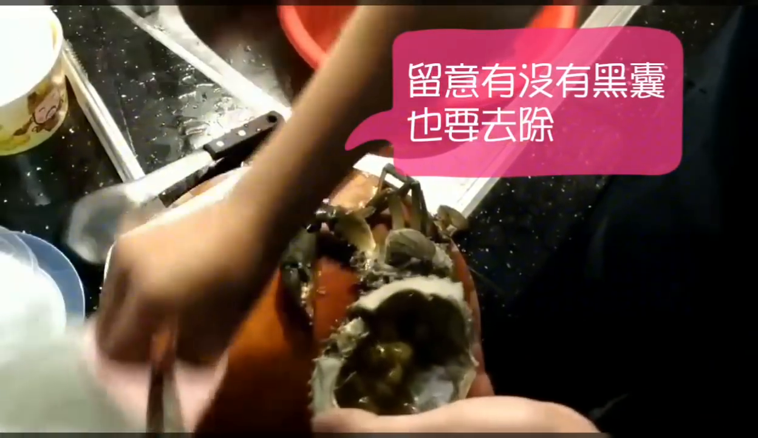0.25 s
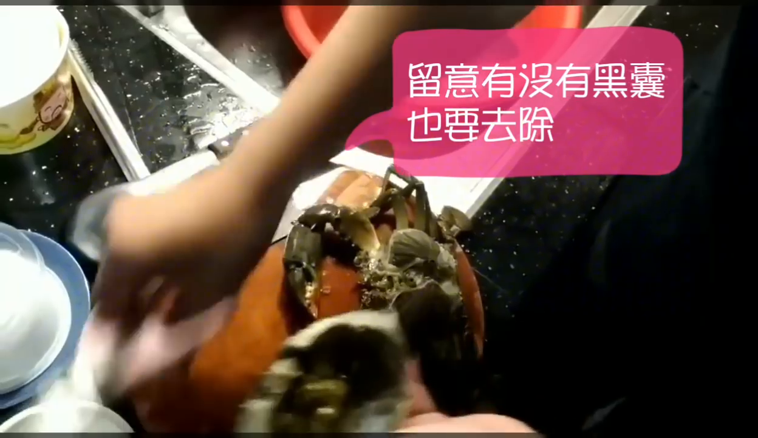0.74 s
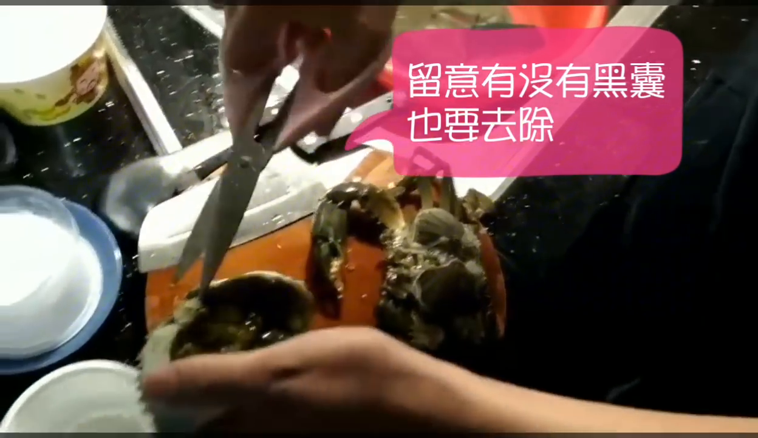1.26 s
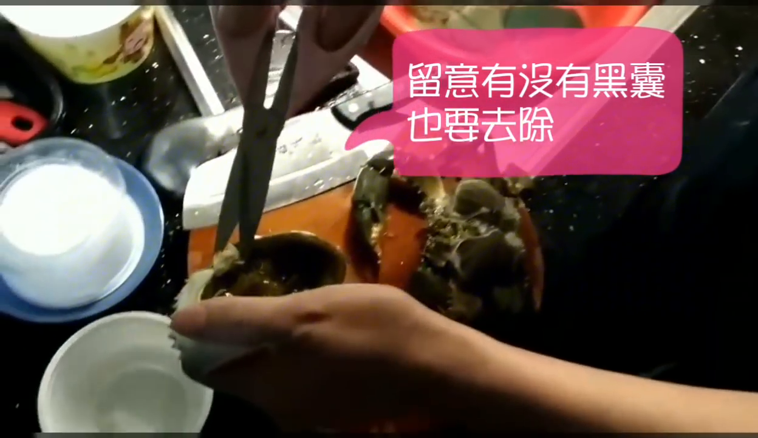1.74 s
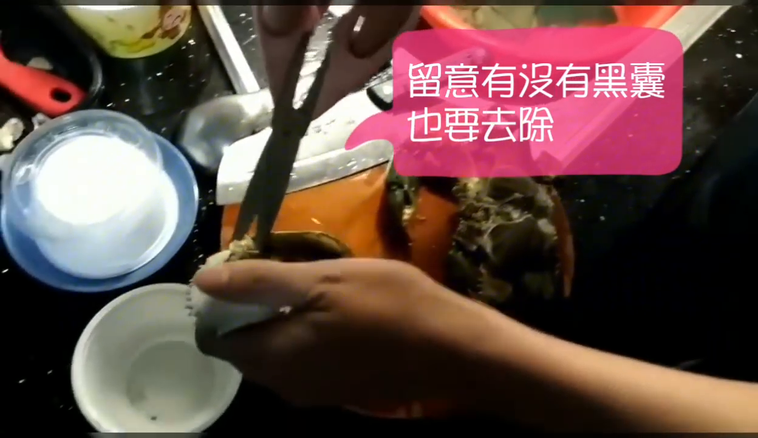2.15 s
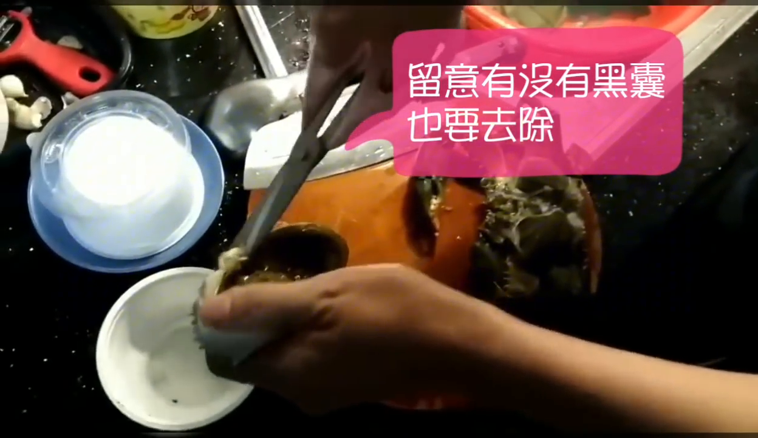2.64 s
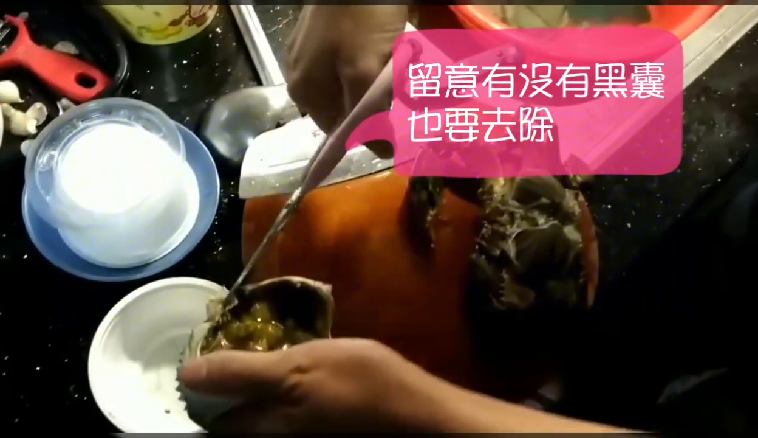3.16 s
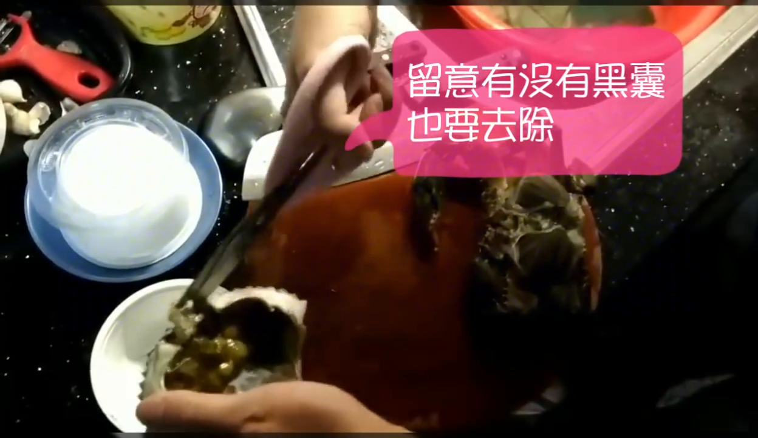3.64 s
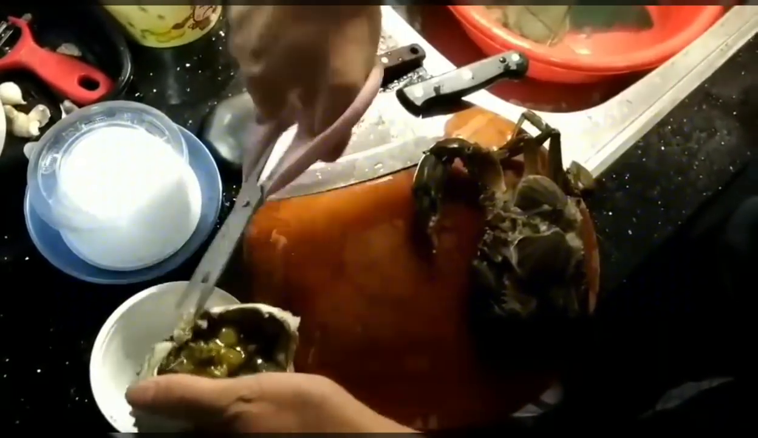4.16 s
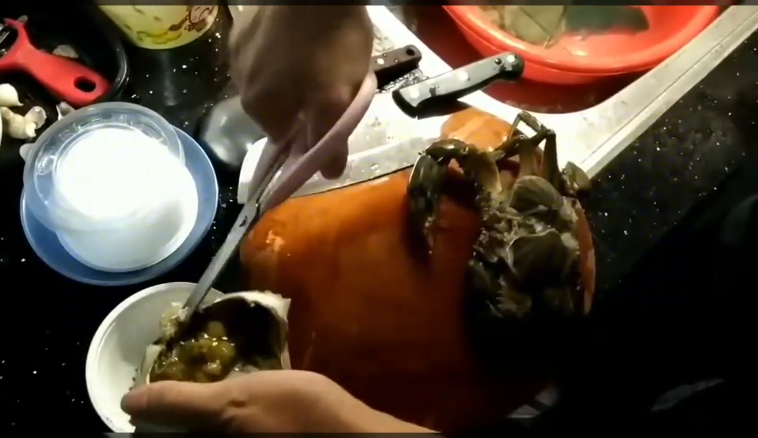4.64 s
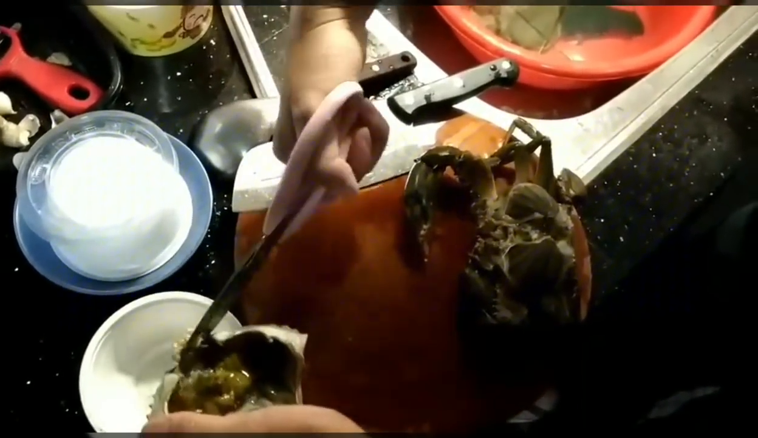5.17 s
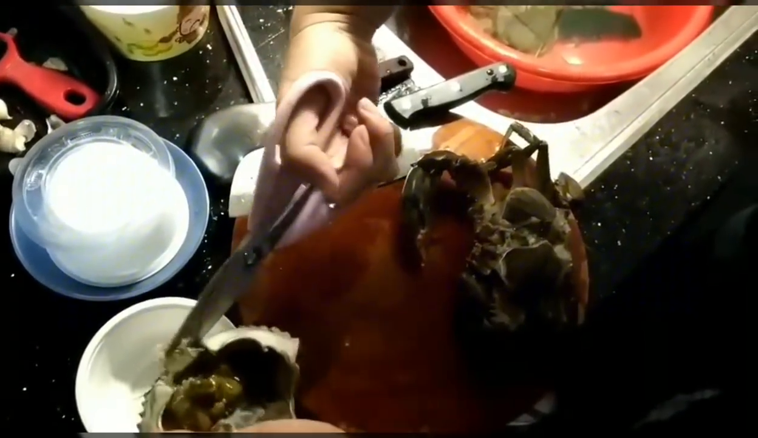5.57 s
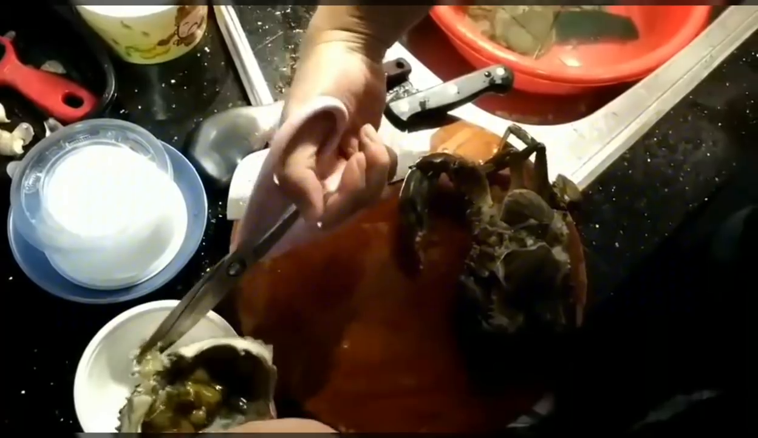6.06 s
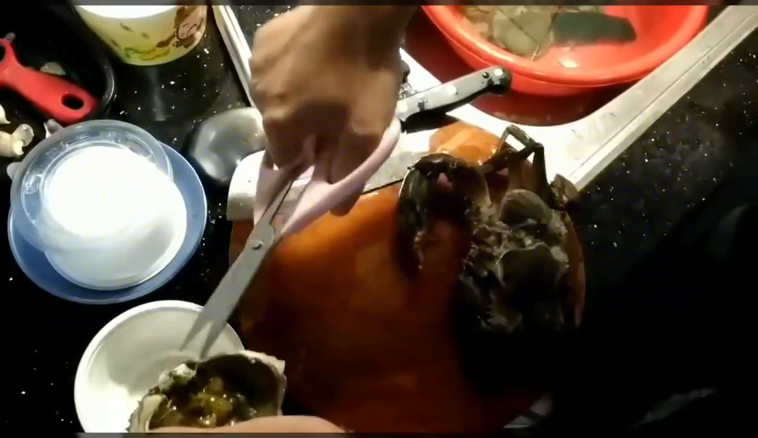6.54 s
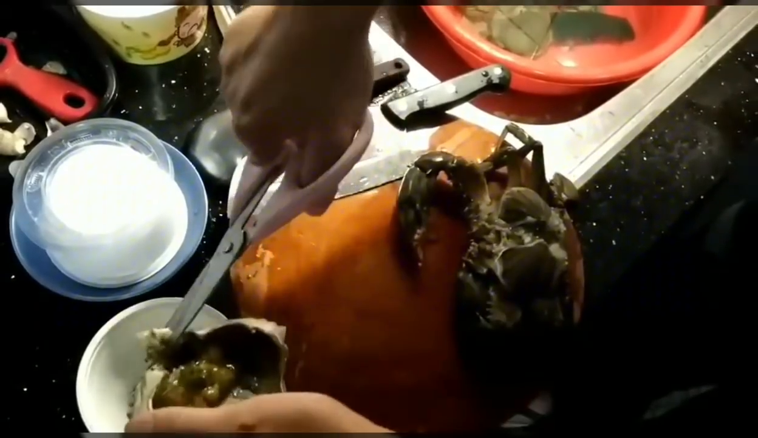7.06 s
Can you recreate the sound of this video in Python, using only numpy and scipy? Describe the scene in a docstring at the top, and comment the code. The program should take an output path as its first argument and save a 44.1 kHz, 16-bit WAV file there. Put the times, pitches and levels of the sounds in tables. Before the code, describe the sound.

Close stereo pickup in a small, hard kitchen with a quiet low appliance hum and faint airy hiss. A china bowl lands on a stone counter, knocking and clinking, then rattles as it is nudged. Scissors tick and scrape lightly at a crab shell, give a few sharp cracks, then a dense run of brittle snaps and gritty rubbing, fading to small ticks and a last scrape.

```python
"""China bowl and crab shell

A china bowl knocks low and clinks high as it is set down on a stone counter and nudged into place.
Then kitchen scissors pick, scrape and crack their way round the rim of a hand-held crab shell, and
at times click shut in the air: each snap is a burst of impulses through ringing modes, with a thud,
treble spray and splinters. Rubbing is a train of tiny slips. A small hard kitchen of decaying noise
answers, over the steady tones of an appliance, a low drone, a soft rush of air and a faint hiss."""
import sys
import numpy as np
from scipy import signal
from scipy.fft import rfft, irfft, next_fast_len
from scipy.io import wavfile
from scipy.ndimage import uniform_filter1d, map_coordinates

SR = 44100
rng = np.random.default_rng(int(sys.argv[2]) if len(sys.argv) > 2 else 0)


def unload_audio(sound):
    """Save the sound as a 16-bit wav file, at the path given as the first command line argument."""
    columns = np.transpose(np.atleast_2d(sound))
    # keep every value between -1 and 1, then stretch to whole-number steps
    steps = np.round(np.clip(columns, -1, 1) * 32767)
    wavfile.write(sys.argv[1], SR, steps.astype(np.int16))


N = 322318
SIZE = 32768  # samples in one response
HZ = np.fft.rfftfreq(SIZE, 1 / SR)
AGE = np.arange(SIZE) / SR
TIME = np.arange(N) / SR
TOP_HZ = 13200  # upper band limit
MIC_SPACING_M = .15
LEAD_S = .003  # room for the softened onset


def amp(db):
    """Decibels to gain."""
    return 10 ** (np.asarray(db) / 20)


def unit(x):
    """Scale to rms 1."""
    return x / np.sqrt(np.mean(x ** 2) + 1e-20)


def along(points, hz):
    """Read (Hz, value) points on a log axis."""
    f, v = np.transpose(points)
    return np.interp(np.log(hz + 1), np.log(f + 1), v)


def shape(points):
    """Gain of a spectrum, with unit power."""
    return unit(amp(along(points, HZ)))


def curve(rows):
    """One value per sample from (s, value) rows."""
    return np.interp(TIME, *np.transpose(rows))


def wobble(rate):
    """A smooth random curve, rate knots a second."""
    knots = rng.standard_normal(int(N * rate / SR) + 4)
    return map_coordinates(knots, [TIME * rate])


def lift(modes):
    """Resonance peaks standing on a flat response."""
    power = 1
    for hz, width, db in modes:
        power = power + amp(db) ** 2 / (1 + (2 * (HZ - hz) / width) ** 2)
    return np.sqrt(power)


def causal(gain):
    """The minimum-phase impulse response of a gain curve."""
    cepstrum = irfft(np.log(np.maximum(gain, gain.max() * 1e-6)))
    cepstrum[1:SIZE // 2] *= 2
    cepstrum[SIZE // 2 + 1:] = 0
    return irfft(np.exp(rfft(cepstrum)))


def convolve(x, response):
    """Convolve along time, keeping the length of x."""
    return signal.fftconvolve(np.atleast_2d(x), np.atleast_2d(response), axes=1)[:, :x.shape[-1]]


def add(track, s, sound):
    """Mix a sound into the track at time s."""
    start = max(round(s * SR), 0)
    track[:, start:start + sound.shape[1]] += sound[:, :track.shape[1] - start]


def diffuse(size):
    """White noise from all sides: alike at both microphones in the bass, unrelated in the treble."""
    alike = .86 * np.sinc(2 * np.fft.rfftfreq(size, 1 / SR) * MIC_SPACING_M / 343)  # 343 m/s: sound
    white = rfft(rng.standard_normal((2, size)))
    mid, side = irfft(white * np.sqrt([1 + alike, 1 - alike]), size)
    return unit(np.array([mid + side, mid - side]))


def noise(spectrum):
    """Coloured stereo noise of rms 1."""
    white = diffuse(next_fast_len(N + SIZE))
    return unit(convolve(white, causal(shape(spectrum)))[:, -N:])


def patchy(x, depth_db):
    """Let each region of a noise's spectrum swell and sink on its own."""
    z = signal.stft(x, nperseg=1024)[2]
    field = rng.standard_normal(z.shape[1:])
    field = uniform_filter1d(field, size=6, axis=0)  # across frequency
    field = uniform_filter1d(field, size=12, axis=1)  # across time
    return unit(signal.istft(z * amp(depth_db * unit(field)), nperseg=1024)[1][:, :N])


# steady tones of the appliance: (frequency [Hz], relative level [dB])
HUM_TONES = [(81, -2.5), (237, -7), (2372, -20.5)]
# the soft rush as it swells and fades: (time [s], relative level [dB])
AIR_LEVEL = [(0, -51.5), (.35, -61), (1.7, -61.5), (3.45, -56), (4.8, -61), (6.1, -69.5), (7.31, -65)]
# colours of the low drone, the rush and the hiss: (frequency [Hz], relative level [dB])
DRONE_SPECTRUM = [(20, -33), (40, -4.5), (62, -5.5), (85, 12), (105, -3.5), (160, 2), (245, -1.5),
                  (320, -5), (420, -14), (700, -42.5), (1500, -58)]
RUSH_SPECTRUM = [(120, -20), (300, 7), (440, -3.5), (550, -2.5), (800, -3), (1050, -3.5), (1400, -15.5),
                 (2200, -17), (5000, -29.5), (12000, -64)]
HISS_SPECTRUM = [(500, -14.5), (1200, 1.5), (1900, -4), (2400, 1), (3000, 1), (3800, -5.5), (5000, -8),
                 (7500, -10.5), (12300, -15), (14000, -31)]


def background():
    """Sines with slightly wandering phase hum over three coloured noises: drone, rush and hiss."""
    tones = 0
    for hz, db in HUM_TONES:
        phase = 2 * np.pi * hz * TIME + 0.32 * wobble(19.0)
        tones = tones + amp(db) * np.sin(phase)
    hum = np.sqrt(2) * amp(-62.5) * tones
    drone = amp(-61.5 + 1.3 * wobble(11.0) + 0.9 * wobble(2.3)) * noise(DRONE_SPECTRUM)
    air_db = curve(AIR_LEVEL) + 2.0 + 0.31 * wobble(6.7)
    air = amp(air_db) * patchy(noise(RUSH_SPECTRUM), depth_db=2.5)
    hiss = amp(-72.0) * patchy(noise(HISS_SPECTRUM), depth_db=4.0)
    lean_right = amp([[-.3], [.3]])
    return hum + (drone + air) * lean_right + hiss


# steel or fingers rub: (time the stroke is full [s], length [s], relative level [dB])
RUB_STROKES = [(0.017, 0.07, -55.5), (1.637, 0.017, -57), (1.756, 0.36, -65.5), (2.255, 0.025, -56),
               (2.395, 0.53, -64.5), (3.098, 0.17, -65), (4.379, 0.08, -52.5), (4.547, 0.88, -58.5),
               (5.24, 0.5, -57), (5.85, 0.095, -55.5), (6.913, 0.079, -63), (7.298, .03, -48.5)]
STROKE_RISE_S, STROKE_FADE_S = 0.013, 0.075  # time constants
HANDLING_DB = -73  # light rubbing between strokes, on the scale of the stroke levels


def rub_strength():
    """How strongly steel or fingers rub: each stroke sets in, holds and lets go."""
    strokes = []
    for s, length, db in RUB_STROKES:
        rise = np.minimum(TIME - s, 0) / STROKE_RISE_S
        fade = np.maximum(TIME - s - length, 0) / STROKE_FADE_S
        strokes.append(amp(db) * np.exp(rise - fade))
    return np.maximum(np.max(strokes, axis=0), amp(HANDLING_DB))


def grains(times, centre_hz, octaves, cycles, spread_db, size):
    """Tiny pings, each ringing for a few cycles at its own pitch and strength."""
    pitch, strength = np.clip(rng.standard_normal((len(times), 2)), -2, 2).T[:, :, None]
    hz = np.minimum(centre_hz * 2 ** (octaves * pitch), TOP_HZ)
    age = AGE[:1024]
    ringing = np.sin(2 * np.pi * hz * age) * np.exp(-age * hz / cycles)
    pings = amp(spread_db * strength) * np.sqrt(hz) * ringing
    places = (times * SR).astype(int)[:, None] + np.arange(len(age))
    return np.bincount(places.ravel(), pings.ravel(), size)[:size]


def paths(near_db, near_t60, dull_hz=7000):
    """Short ways to the two microphones: direct, and scattered off nearby things."""
    near = amp(near_db) * unit(diffuse(SIZE) * amp(-60 * AGE / near_t60)) / np.sqrt(SIZE)
    response = convolve(near, causal(1 / np.hypot(1, HZ / dull_hz)))  # reflections lose treble
    response[[0, 1], [0, 7]] += 1  # direct sound: the left microphone is 7 samples nearer
    return response


# how long the kitchen rings: (frequency [Hz], time to fall 60 dB [s])
KITCHEN_T60 = [(150, 0.81), (800, 0.61), (2500, 0.38), (6000, 0.49), (12000, 0.33)]


def kitchen(build_s=0.0011):
    """A fresh tail of the room: it builds up, then each frequency dies at its own speed."""
    hz, t, z = signal.stft(diffuse(SIZE), SR, nperseg=256)
    decay = amp(-60 * t / along(KITCHEN_T60, hz)[:, None])
    tail = signal.istft(z * decay, SR, nperseg=256)[1][:, :SIZE]
    return unit(tail * (1 - np.exp(-AGE / build_s))) / np.sqrt(SIZE)


# ring of the shell between the blades: (frequency [Hz], width [Hz], lift [dB])
SHELL_RING = [(1337, 50, -2.5), (1570, 280, 1), (1980, 140, 14.5), (2260, 75, 9), (2340, 68, 5.5),
              (2410, 110, 5), (3000, 56, -2.5), (2983, 78, 6), (3330, 67, -2), (4360, 140, 2.5),
              (4800, 92, -1.5), (6870, 140, 0.5), (7500, 70, 6.5), (8260, 67, 4.5)]
# colour of the rubbing: (frequency [Hz], relative level [dB])
RUB_SPECTRUM = [(200, -50), (650, 9.5), (1200, 4), (1900, 2.5), (3000, 6), (4500, 1), (7500, -12.5),
                (12000, -17), (14000, -56.5)]
CRACKLE_DB, CRACKLES_PER_S = -9.5, 160  # crumbs: level relative to the rub strength, mean rate


def scraping(slips_per_s=700, spread_db=2.5):
    """Steel or fingers rub in many tiny slips of uneven size, with a crackle of crumbs."""
    caught = rng.random(N) < slips_per_s / SR
    unevenness = amp(spread_db * np.clip(wobble(81), -2, 2))
    slips = caught * rng.uniform(-1.1, 1, N) * unevenness
    colour = unit(shape(RUB_SPECTRUM) * np.sqrt(lift(SHELL_RING)))
    rubbed = convolve(unit(slips), causal(colour))
    crumb_times = TIME[rng.random(N) < CRACKLES_PER_S / SR]
    crumbs = grains(crumb_times, centre_hz=2700, octaves=0.49, cycles=1.8, spread_db=5.0, size=N)
    strength = rub_strength()
    crumb_paths = unit(paths(near_db=-3, near_t60=.04)) / np.sqrt(SIZE)
    crackle = convolve(unit(crumbs) * strength, crumb_paths)
    rub_paths = unit(paths(near_db=6, near_t60=.05) + kitchen()) / np.sqrt(SIZE)
    return amp(-2.0) * convolve(rubbed * strength, rub_paths) + amp(CRACKLE_DB) * crackle


def stray_modes(width_hz, lift_db, count=18):
    """Upper resonances that change with every blow."""
    pitch = 2600 * 4.5 ** ((np.arange(count) + rng.random(count)) / count)  # 2.6 to 11.7 kHz
    chances = rng.standard_normal(count)
    return lift([(hz, width_hz, lift_db + 3 * chance) for hz, chance in zip(pitch, chances)])


def contact(spread, before=0.11, after=0.39, straggle=0.071, count=7):
    """A slightly softened onset, one sharp blow, weaker ones right behind it, then faint stragglers."""
    onset = -LEAD_S * rng.random(count)
    behind = rng.exponential(max(spread, 1e-4), count)
    late = rng.uniform(.012, .05, count)
    times = LEAD_S + np.concatenate([onset, behind, late])
    places = np.clip(times * SR, 0, SIZE - 1).astype(int)
    strengths = np.repeat([before, after, straggle], count) * rng.standard_normal(3 * count)
    force = np.bincount(places, strengths, SIZE)
    force[round(LEAD_S * SR)] += 1
    return force


CHATTER_S, CHATTER_JITTER = .0085, 0.129  # typical gap between rocking contacts; its scatter (share)


def chatter(loss_db, count=5):
    """The force of a rocking foot: a quick run of ever weaker contacts."""
    gaps = CHATTER_S * np.exp(CHATTER_JITTER * rng.standard_normal(count))
    force = np.zeros((1, SIZE))
    for k, s in enumerate(np.cumsum(gaps) - gaps[0]):
        hit = contact(.003, before=0.1, after=0.26, straggle=0.018)
        add(force, s, amp(-loss_db * k) * hit[None])
    return force


def coloured(force, response, gain):
    """A force through a response; the gain sets the colour and the energy that arrives."""
    arriving = rfft(response) * rfft(force)
    colour = uniform_filter1d(np.mean(abs(arriving) ** 2, axis=0), size=170)
    return irfft(arriving * rfft(causal(gain / np.sqrt(abs(colour)))))


def blow(force, gain, close, room_db, size):
    """A struck body heard close by and round the kitchen, whose directions blur peaks over size bins."""
    blurred = np.sqrt(abs(uniform_filter1d(gain ** 2, size=size)))
    room_gain = np.minimum(blurred, 2 * gain)
    return coloured(force, close, gain) + amp(room_db) * coloured(force, kitchen(), room_gain)


# the bowl meets the counter:
# (time [s], relative clink level [dB], relative knock level [dB], lift of the foot's note [dB])
BOWL_KNOCKS = [(0.03, -41.5, -30, 1), (0.4843, -13.5, -13, -3.5), (0.501, -18.5, -20, -13),
               (.631, -37.5, -35, -4), (0.6535, -31.5, -34, 16), (0.731, -26.5, -28.5, -1),
               (0.7811, -32, -37, 10), (.820, -45, -34, 9), (0.844, -41, -40, 11), (.870, -32.5, -31.5, 3),
               (.890, -44, -36.5, 2), (.901, -50, -45, 3)]
# ring of the bowl on the counter: (frequency [Hz], width [Hz], lift [dB])
BOWL_RING = [(500, 16, 5), (753, 22, 11), (857, 48, 21), (1045, 30, 7), (1092, 20, 7), (1172, 45, 10),
             (1302, 30, 5), (2075, 90, 4), (2556, 40, 4), (2885, 60, 6), (3130, 60, 7), (4930, 50, 4),
             (5355, 20, 7), (6420, 50, 4), (8600, 150, 5)]
# colours of the dull knock and the bright clink: (frequency [Hz], relative level [dB])
KNOCK_SPECTRUM = [(25, -38), (90, -21), (200, -18.5), (330, -8.5), (550, -6), (850, -12.5), (1300, 1),
                  (1700, -5), (4000, -54)]
CLINK_SPECTRUM = [(600, -42), (1600, 1.5), (3000, -0.5), (4000, 3), (5500, 1), (7000, -6.5), (8600, -9),
                  (10000, -12), (12300, -14), (14000, -75.5)]
HARD_BLOW_DB = -12  # tabled clink level of a full landing, to which the next settings refer
CHATTER_LOSS_DB, SETTLES = 6.5, 0.13  # loss per contact; further dB lost per dB of softness
CLINK_TOP_HZ, CLINK_DULLS = 10000, 0.35  # treble reach; softer blows reach less high (power of strength)
KNOCK_TOP_HZ, KNOCK_DULLS = 1414, 0.13  # the same for the knock
FOOT_HZ, FOOT_WIDTH_HZ = 486, 200  # low note of the foot bumping along the counter


def bowl():
    """The china foot lands and is nudged along, knocking low and clinking high as it rocks."""
    track, china = np.zeros((2, N)), lift(BOWL_RING)
    for s, clink_db, knock_db, foot_db in BOWL_KNOCKS:
        softer_db = HARD_BLOW_DB - clink_db
        bright_hz = CLINK_TOP_HZ * amp(-CLINK_DULLS * softer_db)
        top_hz = KNOCK_TOP_HZ * amp(-KNOCK_DULLS * softer_db)
        clink = china * stray_modes(width_hz=60, lift_db=2.5) * shape(CLINK_SPECTRUM)
        clink = clink / np.hypot(1, (HZ / bright_hz) ** 2)
        knock = china * lift([(FOOT_HZ, FOOT_WIDTH_HZ, foot_db)]) * shape(KNOCK_SPECTRUM)
        knock = knock / np.sqrt(1 + (HZ / top_hz) ** 16)  # a soft contact leaves upper modes still
        gain = np.hypot(amp(clink_db + 19.0) * unit(clink), amp(knock_db + 19.5) * unit(knock))
        rocking = chatter(CHATTER_LOSS_DB + SETTLES * softer_db)
        close = paths(near_db=8.5, near_t60=0.034)
        add(track, s - LEAD_S, blow(rocking, gain, close, room_db=-4.0, size=30))
    lean_left = amp([[.4], [-.4]])
    return track * lean_left


SPLINTER_DB, SPLINTER_S = 12, .005  # level over the tabled crack; sets how long splinters keep coming


def splinters(crumble, count=9):
    """A handful of bright splintering pings right behind a snap, with unit energy."""
    times = LEAD_S + rng.exponential(np.sqrt(abs(SPLINTER_S * crumble)), count)
    pings = grains(times, centre_hz=5260, octaves=0.52, cycles=5.9, spread_db=1.5, size=SIZE)
    return unit(convolve(pings, paths(near_db=3.5, near_t60=0.04))) / np.sqrt(SIZE)


# the blades break or tick the shell, or click shut in the air: (time [s], relative plate level [dB],
# plate pitch [Hz], lift of the plate's note [dB], lift of the shell's modes [dB],
# thud relative to plate [dB], crack relative to plate [dB], crumbling time [s])
SNAPS_AND_CLICKS = [(1.2114, -28.5, 3100, 10.5, 0, -28.5, -10.5, .0005),
                    (1.594, -29, 2930, 20.5, 8, -14, -23, 0.00056),
                    (1.663, -39.5, 2480, 9, 5, -15, -34, 0.0043),
                    (1.9268, -38.5, 1670, 8, -11, -31, -34, 0.00096),
                    (2.2443, -39.5, 1620, 15, 7, -9, -14, 0.0042),
                    (2.2455, -40, 3570, 3, 10, -26, -18, 0.0023),
                    (2.2535, -38, 3040, 14, 0, -10, -7, 0.0063),
                    (2.508, -38.5, 1610, 6.5, -2.5, -24, -33, 0.0017),
                    (2.592, -45.5, 2140, 4, 2.5, -30, -34, .002),
                    (2.678, -41, 1520, 7, -4.5, -14, -10, .002), (2.688, -40, 2400, 6, 5, -27, -19, 0.0033),
                    (2.6984, -28, 1485, 15.5, -17, -18, -20, 0.0004),
                    (2.701, -30, 2210, 16, -2, -22, -7, 0.0014),
                    (2.9444, -13, 2500, 14, -3, -16, -6.5, .0016),
                    (2.946, -21.5, 1390, -1.5, -5.5, -36, -20, .003),
                    (3.6216, -15, 1266, 3, -1, -19.5, -11, 0.001),
                    (3.6229, -13, 3100, 0, -1, -28, -14, 0.0015),
                    (3.6358, -16, 2430, 7, -2, -17, -5.5, 0.0035),
                    (3.677, -27.5, 2100, 10, -3, -16, -13, 0.0026),
                    (4.344, -36.5, 2850, -4, -4, -13.5, -17.5, 0.0023),
                    (4.407, -45.5, 2100, 4, 3, -22.5, -5.5, .004),
                    (4.424, -44.5, 3500, 3, -2, -20, -10, .003),
                    (4.468, -45, 2000, 5, 0.5, -20, -10.5, .002),
                    (4.488, -41.5, 2100, 3, -2, -12, -18, .003),
                    (4.655, -38.5, 2920, 8, -5, -13, -8.5, 0.0017),
                    (4.667, -45, 2900, 1, -5.5, -22.5, -2, .005),
                    (4.744, -35, 1900, 14.5, -2, -12.5, -9.5, .003),
                    (4.756, -39.5, 1950, 9, -2, -22, -14, .001),
                    (4.8427, -39.5, 1890, 8, -5, -9.5, -28.5, 0.0013),
                    (4.874, -40, 2090, 8, -0.5, -15.5, -9, 0.0022),
                    (4.898, -25.5, 2000, 8, -0.5, -15, -18, .0014),
                    (4.9129, -17, 3020, 1, -4, -26, -7, .002),
                    (4.9196, -22, 1960, 7.5, -2, -21, -17.5, .0008),
                    (4.9253, -27.5, 3000, 5.5, -2, -23.5, -6.5, .0006),
                    (4.9914, -11, 2600, 11, 0, -23, -4.5, .0018),
                    (5.0005, -24.5, 2103, 6, 3, -19.5, -7, 0.001),
                    (5.169, -34, 1970, -10, 0.5, -22, -2.5, .004),
                    (5.175, -41, 1280, 10, -3, -22, -2.5, 0.0031),
                    (5.281, -44.5, 2100, 5, 0, -20, -16, .002),
                    (5.3678, -10, 2900, 9, 4.5, -26.5, -12.5, 0.0024),
                    (5.3732, -12.5, 2000, 6, 5, -19.5, -7.5, 0.0013),
                    (5.5007, -16.5, 1980, 11, -6, -20.5, -5, 0.0023),
                    (5.508, -24, 2050, 8, 10, -12, -3.5, 0.0026),
                    (5.6106, -24.5, 2910, 9, 5, -13.5, -11, 0.0021),
                    (5.6717, -13.5, 2010, 6, -6, -20, -6.5, 0.0015),
                    (5.703, -32, 2190, 5, 2, -10, -7, .001), (5.7287, -30.5, 2150, 8, 0, -13.5, -3, 0.0094),
                    (5.854, -39, 1670, 7, -9, -5.5, -9, 0.0041),
                    (5.864, -32, 2380, 13, -1, -12.5, -15, 0.0049),
                    (5.884, -40.5, 2330, 6, -2, -7, -9, 0.0071),
                    (5.958, -59, 3000, -7, -11, -17, 8, 0.0048),
                    (6.3117, -49, 2880, 15.5, -5, -17, -2, .001),
                    (6.322, -47, 3000, 1, -9, -11, 8.5, .0007), (6.884, -43, 1655, 9, -5, -24, -12, 0.0031),
                    (6.888, -42.5, 3400, 4, -3, -30, -22, 0.0036),
                    (6.898, -44.5, 2600, 3, -6, -12, -22, 0.0025)]
# colours of the thud and the treble spray: (frequency [Hz], relative level [dB])
THUD_SPECTRUM = [(25, -58.5), (90, -25.5), (200, -8), (330, 2), (560, 3), (800, 6.5), (1050, 5), (1600, 6),
                 (4000, -47.5)]
CRACK_SPECTRUM = [(1000, -34.5), (3200, 5.5), (4800, 6), (7000, 2.5), (9500, -1), (12300, -5), (14000, -86)]
# half-bandwidth of a plate at 2 kHz; smaller, higher plates ring less purely (power of pitch)
PLATE_OCTAVES, PLATE_WIDENS = 0.44, 0.43
PLATE_RING_WIDTH_HZ = 170  # width of the plate's own note
GRIP_DB = 2.5  # how far each shell mode changes with the grip of the blades
# nearby scatter of a usual snap; its growth per doubling of the crumbling time
RATTLE_DB, RATTLE_GROWS_DB, USUAL_CRUMBLE_S = 5, 2, .002


def snips():
    """Each snap or click rings, thuds, sprays treble and sheds splinters."""
    track, hollow, spray = np.zeros((2, N)), shape(THUD_SPECTRUM), shape(CRACK_SPECTRUM)
    for s, plate_db, plate_hz, note_db, shell_db, thud_db, crack_db, crumble in SNAPS_AND_CLICKS:
        gripped = [(hz, width, db + shell_db + GRIP_DB * rng.standard_normal())
                   for hz, width, db in SHELL_RING]
        note = (plate_hz, PLATE_RING_WIDTH_HZ, note_db)
        ring = lift(gripped + [note]) * stray_modes(width_hz=62, lift_db=6.0)
        octaves = PLATE_OCTAVES * (plate_hz / 2000) ** PLATE_WIDENS
        distance = np.log2(HZ / plate_hz + 1e-6) ** 2 / octaves ** 2
        plate = ring / np.sqrt(1 + distance ** 3)
        power = (amp(plate_db + 18.5) * unit(plate)) ** 2
        power += (amp(plate_db + thud_db + 23.5) * hollow) ** 2
        power += (amp(plate_db + crack_db + 20.0) * unit(ring * spray)) ** 2
        doublings = np.log2(abs(crumble / USUAL_CRUMBLE_S) + 1e-6)
        close = paths(near_db=RATTLE_DB + RATTLE_GROWS_DB * doublings, near_t60=0.056)
        snap = blow(contact(crumble), np.sqrt(power), close, room_db=-8.0, size=170)
        flying = amp(plate_db + crack_db + SPLINTER_DB) * splinters(crumble)
        add(track, s - LEAD_S, snap + flying)
    lean_left = amp([[.8], [-.8]])
    return track * lean_left


def scene():
    """Everything on and around the counter."""
    return background() + scraping() + bowl() + snips()


def record(dry):
    """A steep low-pass ends the treble at the band limit."""
    size = next_fast_len(N + SIZE)
    passband = 1 / np.hypot(1, (np.fft.rfftfreq(size, 1 / SR) / TOP_HZ) ** 50)
    return irfft(rfft(dry, size) * passband, size)[:, :N]


dry = scene()
out = record(dry)
unload_audio(out)
```